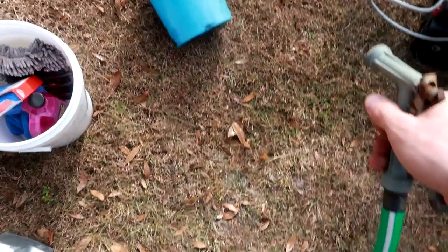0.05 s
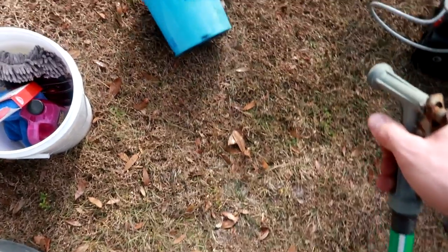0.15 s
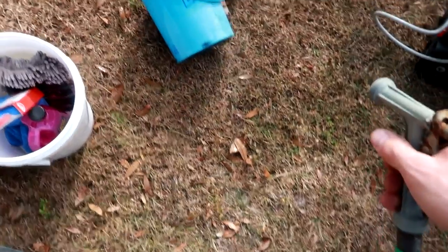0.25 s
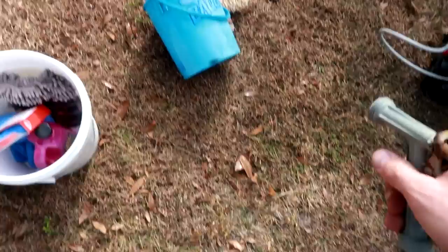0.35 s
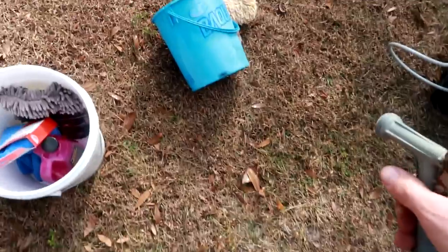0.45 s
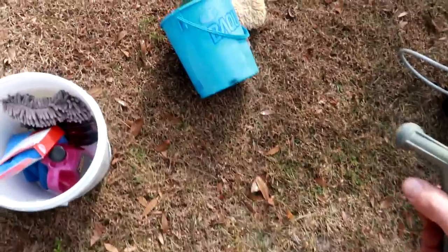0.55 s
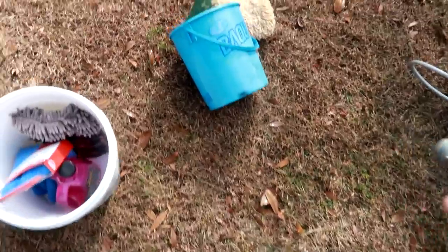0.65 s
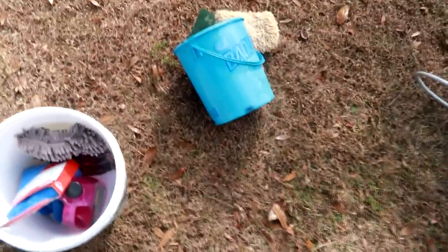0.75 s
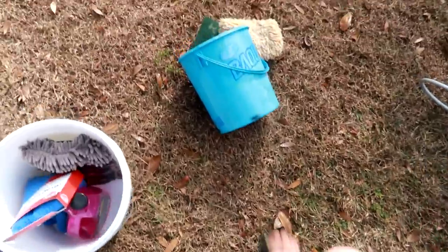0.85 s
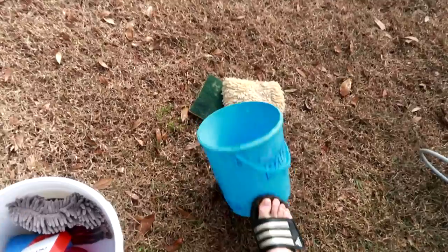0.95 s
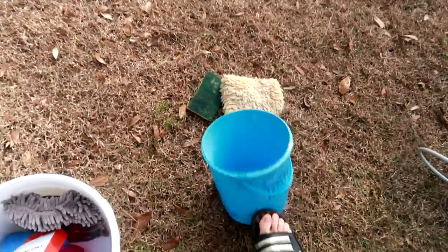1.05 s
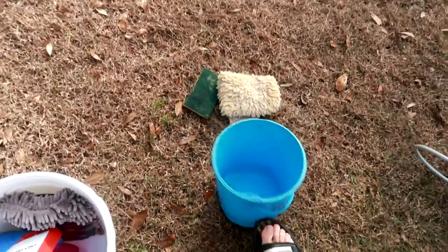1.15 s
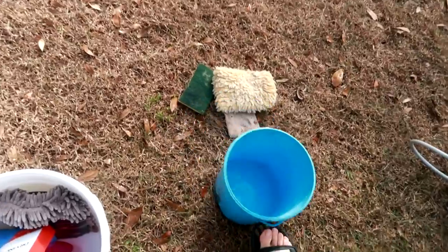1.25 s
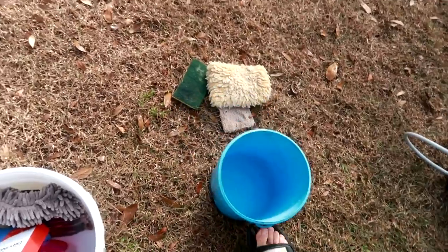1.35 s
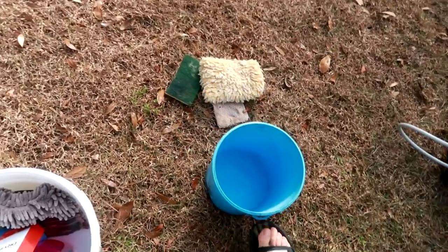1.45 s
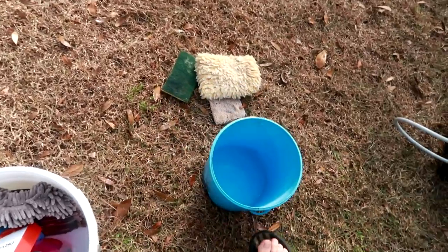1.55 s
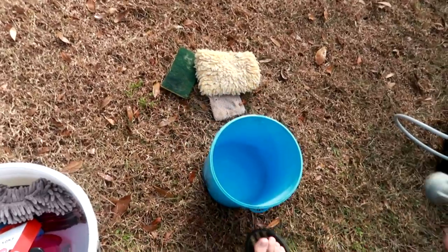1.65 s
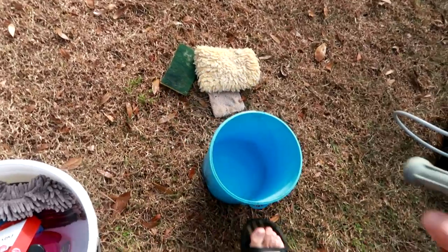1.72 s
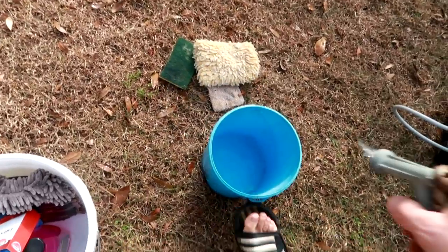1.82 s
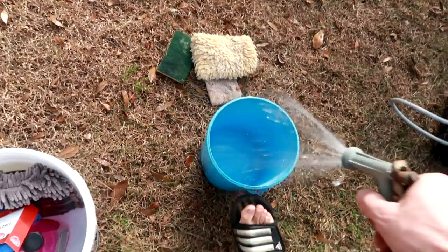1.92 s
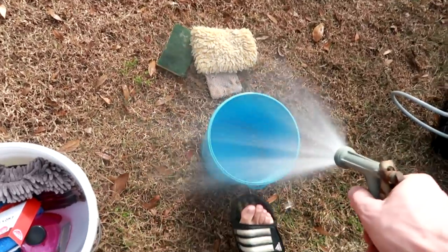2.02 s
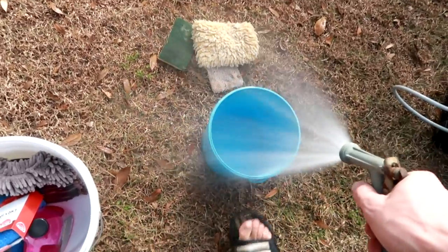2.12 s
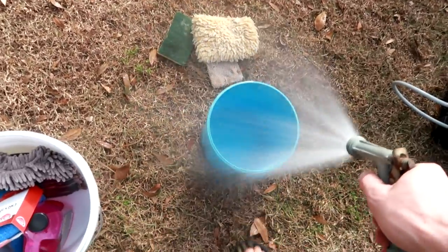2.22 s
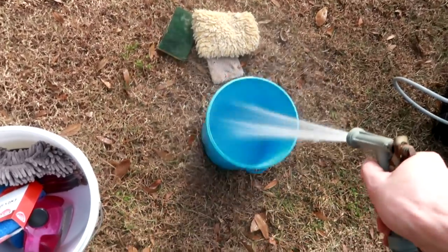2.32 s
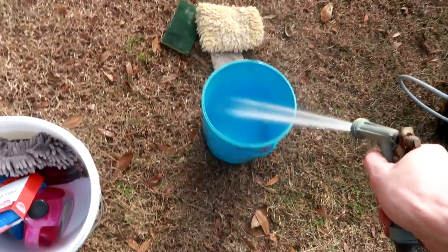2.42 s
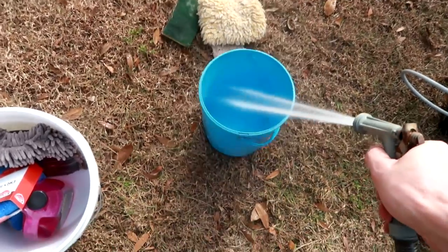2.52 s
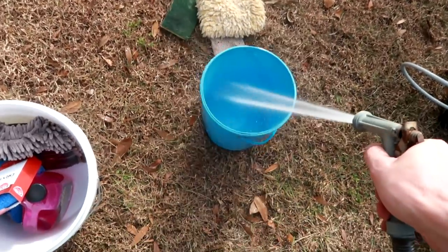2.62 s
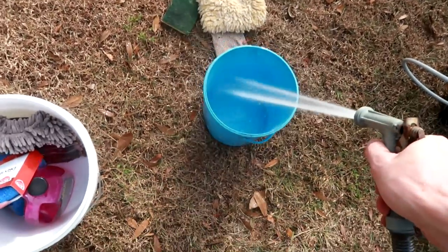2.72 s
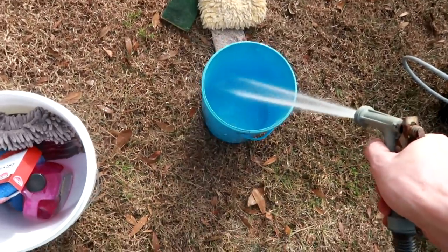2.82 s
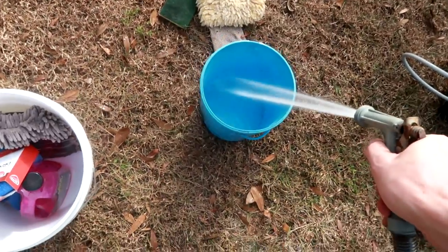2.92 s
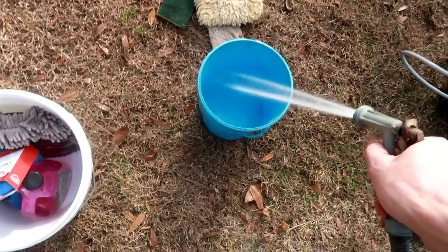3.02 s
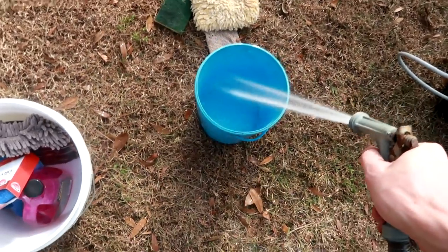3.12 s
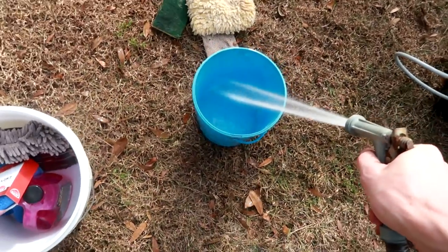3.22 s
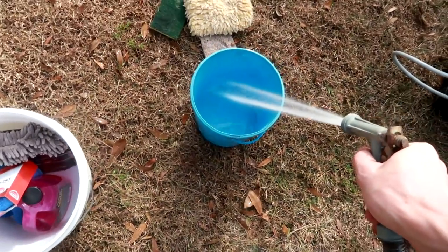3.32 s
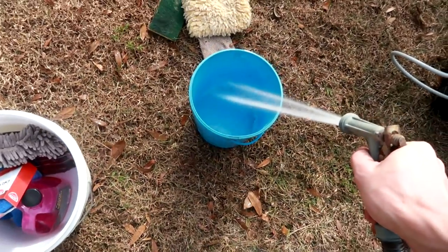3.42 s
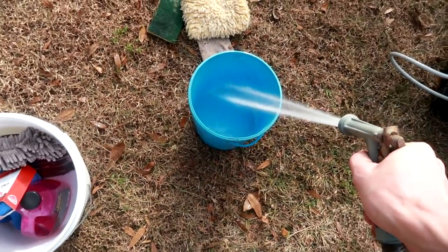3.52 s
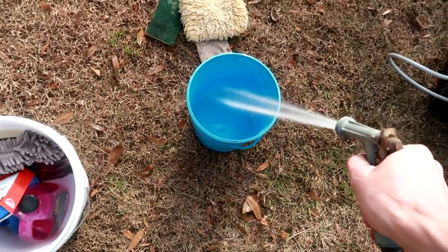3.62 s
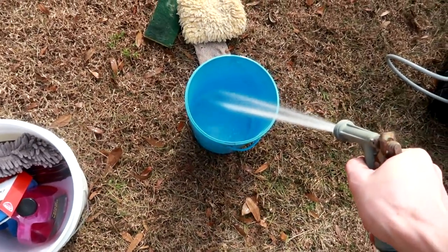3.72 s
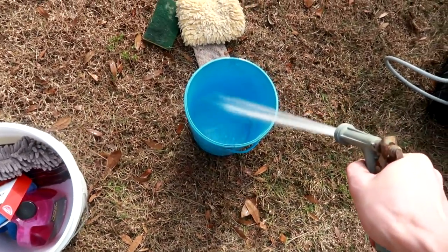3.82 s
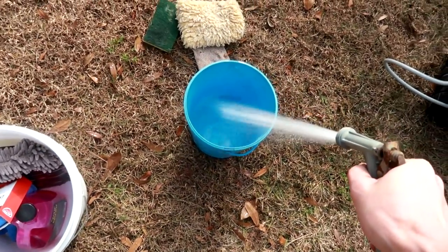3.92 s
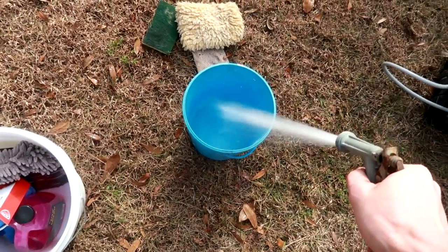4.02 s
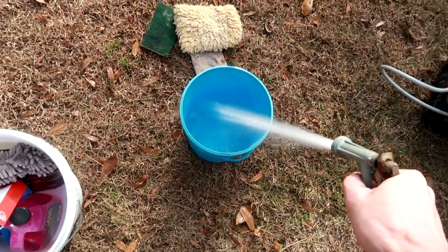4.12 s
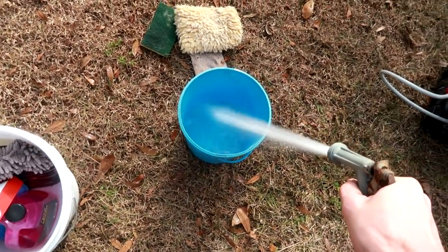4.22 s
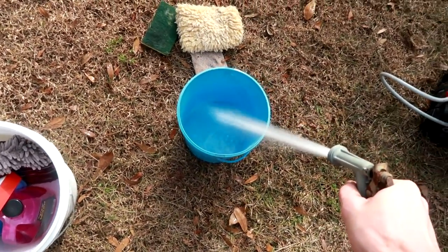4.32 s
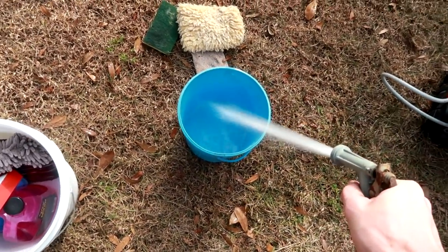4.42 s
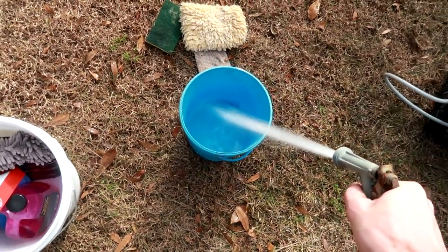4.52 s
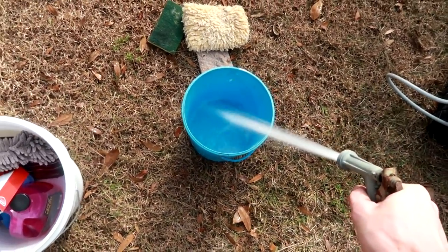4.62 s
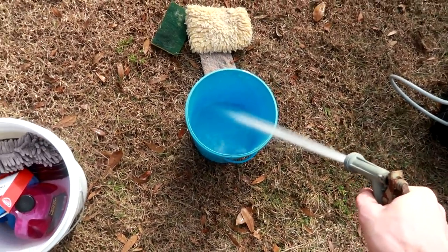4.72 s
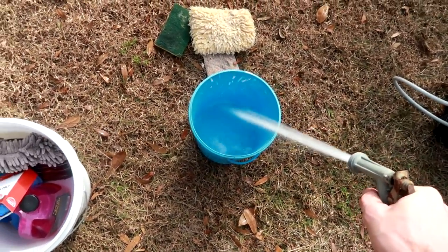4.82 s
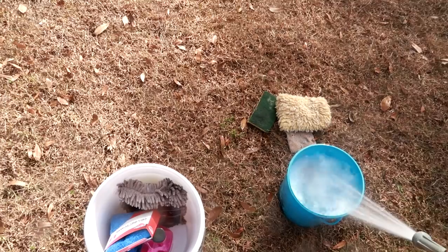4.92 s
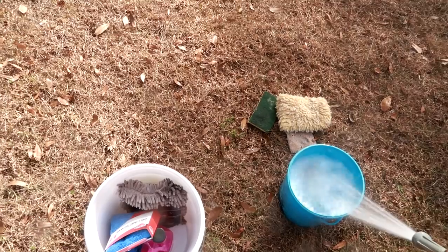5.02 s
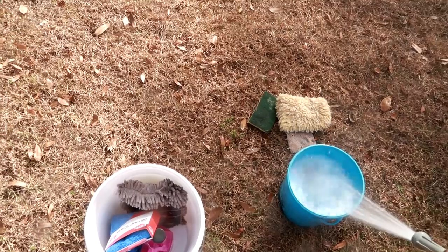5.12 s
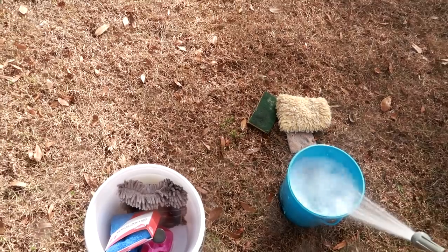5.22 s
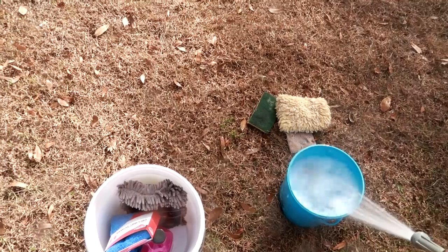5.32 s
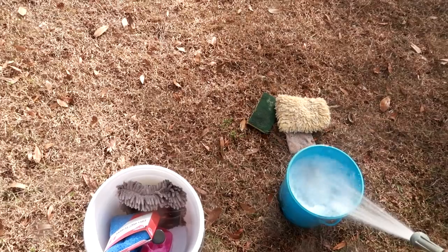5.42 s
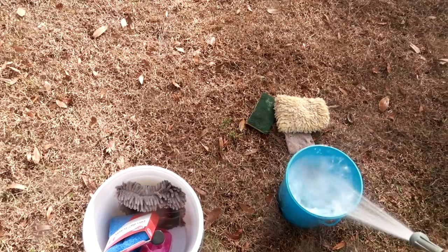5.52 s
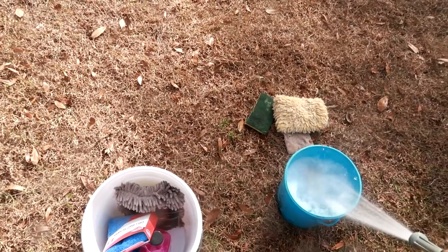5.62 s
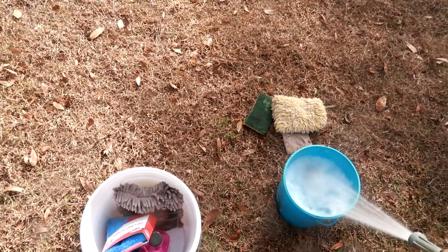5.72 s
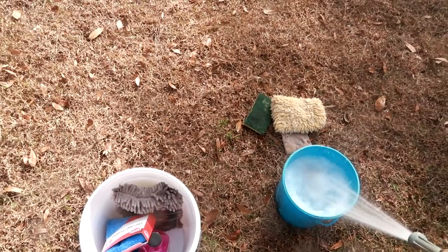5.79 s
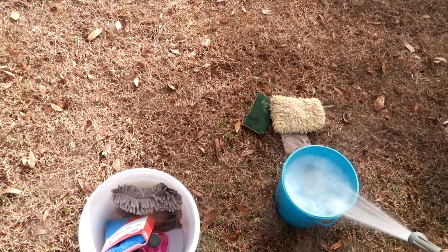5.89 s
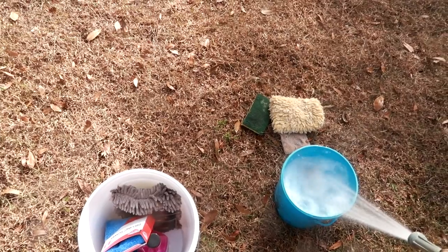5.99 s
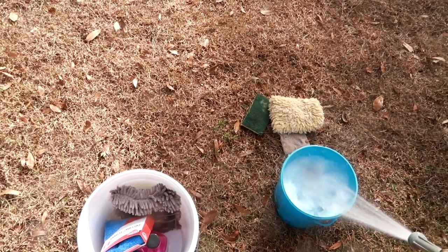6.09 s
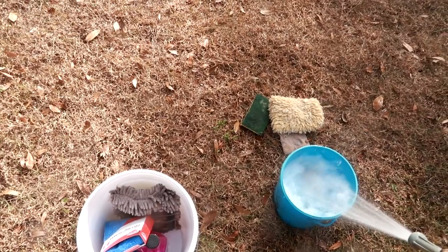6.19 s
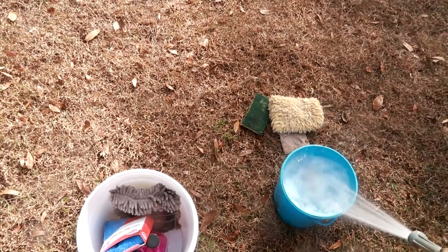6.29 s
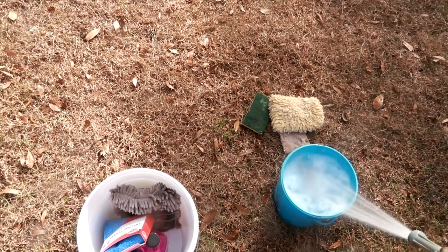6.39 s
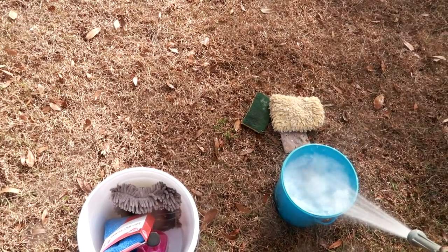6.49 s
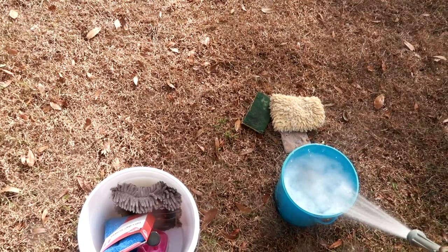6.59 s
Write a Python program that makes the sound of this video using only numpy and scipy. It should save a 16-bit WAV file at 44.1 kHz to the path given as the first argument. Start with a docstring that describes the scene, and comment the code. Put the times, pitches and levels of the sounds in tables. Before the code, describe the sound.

Close outdoor stereo pickup of a plastic bucket being rolled upright on crackling dry grass, with light knocks and a brief rim scrape. After a quiet pause, a hose nozzle spits and whistles, opens into a pattering fan, then narrows to a hard jet that drums on plastic, splatters, churns and gulps in the hollow. A sudden cut brings a steady rush into deep foam over a low drone. Faint open-air rumble lies beneath.

```python
"""Outdoors a plastic bucket is rolled upright: dry grass crackles, the plastic knocks and its rim scrapes.
A hose nozzle spits, whistles and opens to a fan of fine drops, then narrows to a hard jet. Random impacts
through resonances make the jet drum on the wall, splatter, churn and boom in the hollow, as large air
pockets gulp and gurgle. The scene then jumps to the nearly full bucket: an even rush into foam over a drone.
The open air's filtered-noise rumble lies under all of it."""
import sys
import numpy as np
from scipy import signal
from scipy.fft import rfft, irfft, next_fast_len
from scipy.io import wavfile

SR = 44100
rng = np.random.default_rng(int(sys.argv[2]) if len(sys.argv) > 2 else 0)


def unload_audio(sound):
    """Save the sound as a 16-bit wav file, at the path given as the first command line argument."""
    columns = np.transpose(np.atleast_2d(sound))
    # keep every value between -1 and 1, then stretch to whole-number steps
    steps = np.round(np.clip(columns, -1, 1) * 32767)
    wavfile.write(sys.argv[1], SR, steps.astype(np.int16))


N = 293337
TIME = np.arange(N) / SR
SIZE = next_fast_len(N + 4096)
FREQ = np.maximum(np.arange(SIZE // 2 + 1) * SR / SIZE, 1)
LOG_FREQ = np.log(FREQ)

# Standing waves in the nearly empty bucket. Each row: frequency in Hz, width in Hz, level in dB.
EMPTY_BUCKET = [(1423, 28, 10.5), (1495, 77, -7), (1743, 79, 3.5), (1930, 110, -6), (2270, 120, 3.5),
                (2524, 140, -7), (2584, 56, 11.5), (3090, 150, 3.5), (3400, 91, 0), (4040, 100, 4),
                (4460, 300, 0.5), (5100, 280, -5.5)]
# Left over right at the microphones, full above the bass. Each row: frequency in Hz, level in dB.
JET_BALANCE = [(300, .5), (480, 3), (700, 5.5), (920, 8.3), (1200, 5), (1450, 0), (1850, -2.7), (3200, 0),
               (10000, .4)]
# Likeness of the two microphones. Each row: frequency in Hz, likeness (1 = same direct sound only).
JET_LIKENESS = [(300, 0.95), (850, 1), (1200, 0.9), (1500, 0.7), (2000, 0.87), (3300, 0.97), (9000, .93),
                (12000, .74), (15000, .55)]
# Lead of the left microphone, full above the bass. Each row: frequency in Hz, phase in radians.
JET_PHASE = [(400, .04), (1150, .25), (1900, -.33), (4500, .15), (7000, .05), (10500, .42), (13000, 1)]


def from_db(db):
    """Decibels to gain."""
    return 10 ** (np.asarray(db) / 20)


def rms_one(x):
    """Scale so that the mean of the channels has rms 1."""
    return x / np.sqrt(np.mean(np.atleast_2d(x).mean(axis=0) ** 2) + 1e-20)


def in_time(rows):
    """Interpolate the columns of a time curve at every sample."""
    s, *columns = np.transpose(rows)
    return [np.interp(TIME, s, c) for c in columns]


def gains(rows):
    """dB columns as gains that die away outside the curve's span."""
    before_s = np.maximum(rows[0][0] - TIME, 0)
    after_s = np.maximum(TIME - rows[-1][0] - .04, 0)
    fade = np.exp(-(before_s + after_s) * 100)
    return [from_db(db) * fade for db in in_time(rows)]


def over_hz(points):
    """Join a spectrum's points on a log-frequency axis."""
    hz, value = np.transpose(points)
    return np.interp(LOG_FREQ, np.log(hz), value)


def filtered(x, response):
    """Pass a sound through a frequency response."""
    return irfft(rfft(x, SIZE) * response, SIZE)[..., :N]


def causal(gain):
    """Give a gain curve its minimum phase, so that it rings after an impact and never before."""
    cepstrum = irfft(np.log(gain + 1e-9), SIZE)
    cepstrum[1:SIZE // 2] *= 2
    cepstrum[SIZE // 2 + 1:] = 0
    return np.exp(rfft(cepstrum))


def colour(points, standing_waves=()):
    """A broad spectrum with the peaks and dips of a container laid over it."""
    peaks_db = sum(db / (1 + (2 * (FREQ - hz) / width) ** 2) for hz, width, db in standing_waves)
    return causal(from_db(over_hz(points) + peaks_db))


def resonance(hz, width_hz):
    """Response of one damped mode, magnitude 1 at its centre."""
    return 1 / (1 + 1j * (FREQ ** 2 - hz ** 2) / (FREQ * width_hz))


def note(excitation, hz, width_hz):
    """A resonance whose pitch moves, rung by the given excitation; rms 1."""
    turn = np.exp(2j * np.pi * np.cumsum(hz) / SR)
    keep = np.exp(-np.pi * width_hz / SR)
    ring = signal.lfilter([1], [1, -2 * keep, keep * keep], excitation / turn)
    return rms_one((ring * turn).real)


def drift(rate_hz):
    """Smooth random wander, rms 1, at about the given rate."""
    return rms_one(filtered(rng.standard_normal(N), 1 / (1 + (FREQ / rate_hz) ** 2)))


def swell(s, sigma_s):
    """A Gaussian rise and fall around one moment."""
    return np.exp(-.5 * ((TIME - s) / sigma_s) ** 2)


def drops(per_s, spread_db):
    """Random impacts, many small and a few large; rms 1."""
    when, size = rng.random((2, N))
    at = np.flatnonzero(when < per_s / SR)
    push = 2 * size[at] - 1   # sets polarity and size: the few values near zero make the big drops
    out = np.zeros(N)
    out[at] = np.sign(push) * from_db(spread_db * np.minimum(-np.log(np.abs(push)), 5))
    return rms_one(out)


def bubbles(per_s, cycles, count=16):
    """Larger bubbles ring out by 60 dB in some cycles each, at pitches over nearly three octaves; rms 1."""
    pitches_hz = np.geomspace(620, 4200, count)
    births = rms_one(drops(per_s, 5.0))
    dealt = rng.integers(0, count, N)
    out = np.zeros(N)
    for k, hz in enumerate(pitches_hz):
        keep = from_db(-60 * hz / (cycles * SR))
        step = 2 * np.pi * hz / SR
        mine = births * (dealt == k) + 1e-18
        out += signal.lfilter([0, np.sin(step)], [1, -2 * keep * np.cos(step), keep * keep], mine)
    return rms_one(out)


def heard(direct, response, likeness, balance=None, phase=None):
    """A source plus scattered sound, coloured, as the two microphones get it; rms 1."""
    # long waves press on both microphones alike; short ones differ by direction and scatter
    bass_hz, bass_mismatch = 280, 0.018
    apart = np.maximum(1 / (1 + (bass_hz / FREQ) ** 4), bass_mismatch)
    sides = np.outer([1, -1], apart)
    alike = np.clip(over_hz(likeness), 0, 1)
    scattered = rfft(rng.standard_normal(N), SIZE) * sides
    pair = np.sqrt(1 + alike) * rfft(direct, SIZE) + np.sqrt(1 - alike) * scattered
    if balance is not None:
        pair = pair * from_db(sides * over_hz(balance) / 2)
    if phase is not None:
        pair = pair * np.exp(.5j * sides * over_hz(phase))
    return rms_one(irfft(pair * response, SIZE)[:, :N])


def between_walls(splash, echoes):
    """Short echoes from the bucket's walls give the treble a slowly shifting, hollow colour."""
    echo_trim_db, above_hz = 2.5, 1700   # longer waves only make the standing waves
    wander_s, wander_hz = .00006, 0.94   # the paths shift as the hand moves the jet
    treble = filtered(splash, 1 / (1 + (above_hz / FREQ) ** 4))
    heard_at = TIME - wander_s * drift(wander_hz)
    return splash + sum(from_db(db + echo_trim_db) * np.interp(heard_at - delay, TIME, treble)
                        for delay, db in echoes)


def heaving(sound):
    """The heaving surface bends the standing waves' pitch by a few percent, at random."""
    heave_s, heave_hz = .0016, 2
    heard_at = TIME - heave_s * drift(heave_hz)
    return np.array([np.interp(heard_at, TIME, channel) for channel in sound])


def follow(law, plunge_db, spray_db):
    """Gain of a layer that grows with the plunge and with the spray."""
    usual_plunge_db, usual_spray_db = -24, -34
    level_db, per_plunge, per_spray = law
    plunge_part_db = per_plunge * (plunge_db - usual_plunge_db)
    spray_part_db = per_spray * (spray_db - usual_spray_db)
    return from_db(level_db + plunge_part_db + spray_part_db)


def outdoors():
    """Low, distant rumble of the open air, as filtered noise, with faint hums and a thin, steady whine."""
    # Rumble spectrum. Each row: frequency in Hz, level in dB.
    air_colour = [(15, -46), (25, -20), (46, -0.5), (118, -3.5), (175, -11), (231, -11.5), (293, -12),
                  (360, -16.5), (425, -14.5), (588, -16.5), (769, -19.5), (980, -21.5), (1300, -22),
                  (2200, -28.5), (11200, -47), (13500, -51), (15000, -67)]
    # Rumble level, which sinks while the jet is loud. Each row: time in seconds, level in dB.
    air = [(0, -45), (.85, -43.5), (1.1, -45.5), (2.4, -46), (2.6, -53.5), (3.2, -57), (4.1, -63.5),
           (4.9, -63), (4.925, -42), (6.65, -42.5)]
    # Each row: frequency in Hz, likeness of the two microphones.
    air_likeness = [(120, 0.23), (240, 0.35), (500, 0.54), (950, 0.42), (3770, 0.0073), (15000, 0)]
    # Each row: frequency in Hz, left over right in dB.
    air_balance = [(200, .3), (500, 1.3), (720, 4), (1100, -.3), (2000, .2), (10000, 0)]
    # Wavering hums far away. Each row: frequency in Hz, width in Hz, level in dB, end in seconds.
    hums = [(296.4, 9.7, -67.5, 6.65), (422, 35, -59, 1.1)]
    waver_db, waver_hz = 0.65, 14
    whine_hz, whine_db = 13006, -84
    level = gains(air)[0] * from_db(waver_db * drift(waver_hz))
    rumble = level * heard(rng.standard_normal(N), colour(air_colour), air_likeness, air_balance)
    hum = np.zeros(N)
    for hz, width_hz, db, end_s in hums:
        fade = np.clip((end_s - TIME) * 10, 0, 1)
        hum += from_db(db) * fade * note(rng.standard_normal(N), np.full(N, hz), width_hz)
    whine = from_db(whine_db) * np.sqrt(2) * np.sin(2 * np.pi * whine_hz * TIME)
    return rumble + hum + whine


def grass():
    """Dry stalks crunch and leaves crackle, as random impacts, while the bucket is rolled upright."""
    # Each row: peak time in seconds, sigma in seconds, crunch level in dB, crackle level in dB.
    rustles = [(.01, 0.029, -51, -48), (0.325, 0.037, -70, -69.5), (0.693, 0.044, -53, -58.5),
               (0.824, 0.02, -61, -59)]
    # Each row: frequency in Hz, likeness of the two microphones.
    rustle_likeness = [(500, .7), (900, .3), (1800, 1), (3200, 0.53), (6000, 0.32), (13000, 0.34)]
    end_s, crunch_db, crackle_db = 1.0, -65, -72   # faint stirring until the bucket stands
    stirring = np.clip((end_s - TIME) * 10, 0, 1)
    crunch = from_db(crunch_db) * stirring
    crackle = from_db(crackle_db) * stirring
    for s, sigma_s, stalks_db, leaves_db in rustles:
        crunch += from_db(stalks_db) * swell(s, sigma_s)
        crackle += from_db(leaves_db) * swell(s, sigma_s)
    stalk_colour = colour([(500, -5), (1050, -12), (1450, -7), (1900, -5), (2400, -7), (3200, -12),
                           (5000, -14), (12000, -40)])
    leaf_colour = colour([(1500, -5), (3500, -1.0), (7000, -0.5), (11500, -5), (15000, -19)])
    stalks = heard(drops(1500, 2.6), stalk_colour, rustle_likeness)
    leaves = heard(drops(2500, 1.1), leaf_colour, rustle_likeness)
    return crunch * stalks + crackle * leaves


def knocks():
    """Knocks and snapping stalks ring the plastic briefly, with one mode that depends on the spot."""
    # Each row: start in seconds, level in dB, spot's ring in Hz, share of the bucket's modes in dB.
    contacts = [(.156, -28.5, 2720, 3.5), (.188, -37.5, 2600, -3), (.470, -46, 3540, -17),
                (.510, -40, 3400, -7), (.636, -49, 3800, -16), (.700, -43, 2900, -16),
                (.714, -35, 1480, -17), (.727, -39, 1300, -16), (.756, -36, 1530, -19),
                (.796, -37, 2340, -17), (.802, -38.5, 2400, -16), (.838, -48, 3000, -15),
                (.980, -48, 3500, -14)]
    # The bucket's modes. Each row: frequency in Hz, level in dB, 60 dB decay in seconds.
    bucket_modes = [(650, 0, 0.025), (1160, -21, .02), (1450, -15, .02), (2090, -11, .02),
                    (4000, -18, .012), (7400, -15, .0055)]
    snap = 7   # the first sharp contact, relative to the scuff that follows
    out = np.zeros(N)
    age = TIME[:SR // 5]
    for s, db, spot_hz, body_db in contacts:
        start = int(s * SR)
        modes = [(hz, level + body_db, t60) for hz, level, t60 in bucket_modes] + [(spot_hz, 0, .006)]
        ring = sum(from_db(level - 60 * age / t60) * np.sin(2 * np.pi * hz * age)
                   for hz, level, t60 in modes)
        contact = rng.standard_normal(len(age)) * np.exp(-age / 0.0048)   # a rough, scuffing touch
        contact[0] += snap
        hit = signal.fftconvolve(ring, contact)[:len(age)]
        knock = hit / np.abs(hit).max() + from_db(body_db - 18) * contact
        out[start:start + len(age)] += from_db(db) * knock
    return filtered(out, colour([(8000, 0.0), (11000, -3), (15000, -14)]))


def scrapes():
    """The rim catches on the ground: quick, uneven slips over grit ring the plastic."""
    # Each row: peak time in seconds, sigma in seconds, pitch in Hz, level in dB.
    catches = [(.665, .018, 1380, -56), (.72, .02, 1430, -49.5), (0.8, 0.007, 2340, -48.5)]
    slips_per_s, width_hz, grit_db = 450, 260, -3
    slips = drops(slips_per_s, 1.5)
    grit_colour = colour([(500, -12), (1100, 0), (2600, -2), (4000, -12), (12000, -28)])
    grit = from_db(grit_db) * rms_one(filtered(slips, grit_colour))
    return sum(from_db(db) * swell(s, sigma_s) * (grit + note(slips, np.full(N, hz), width_hz))
               for s, sigma_s, hz, db in catches)


def nozzle():
    """The valve spits air and water and whistles, then a fan of fine drops patters on bucket and ground."""
    # Air and first water through the valve. Each row: time in seconds, level in dB.
    spit_level = [(1.87, -80), (1.888, -61), (1.925, -60), (1.945, -50.5), (1.968, -47), (1.99, -50),
                  (2.02, -50), (2.06, -55)]
    # Spectra. Each row: frequency in Hz, level in dB.
    spit_colour = [(1500, -7), (4500, -7), (6500, 0), (8500, -1), (10500, 1.5), (12500, -7), (15000, -15)]
    fan_colour = [(60, -24), (160, 5), (230, 4), (300, 10), (420, 2), (540, 3.5), (680, 9), (850, 10),
                  (1100, 4.5), (1700, 1), (3500, 4), (6000, 0.5), (11000, -1.5), (15000, -18)]
    # Each row: frequency in Hz, likeness of the two microphones.
    fan_likeness = [(300, 0.93), (1500, 0.94), (4500, 0.86), (7500, 0.47), (13000, .3)]
    # Each row: frequency in Hz, left over right in dB, full above the bass.
    fan_balance = [(400, .4), (650, 3), (920, 8), (1400, 1.5), (2000, -.7), (10000, .1)]
    spit = gains(spit_level)[0] * heard(drops(9000, 1.9), colour(spit_colour), fan_likeness)

    # the last air whistles through the valve, falling in pitch
    whistle_s, sigma_s, whistle_db = 1.966, 0.01, -42
    start_hz, fall_hz_per_s, width_hz = 10300, 35000, 1500   # start_hz holds at whistle_s
    whistle_hz = start_hz - fall_hz_per_s * np.clip(TIME - whistle_s, -2 * sigma_s, 2 * sigma_s)
    air = note(rng.standard_normal(N), whistle_hz, width_hz)
    whistle = from_db(whistle_db) * swell(whistle_s, sigma_s) * air

    opens_s, rise_s, narrows_s, fall_db_per_s, fan_db = 2.053, 0.063, 2.43, 198, -26.5
    opening = (1 - np.exp(-np.maximum(TIME - opens_s, 0) / rise_s)) ** 2
    level = opening * from_db(fan_db - fall_db_per_s * np.maximum(TIME - narrows_s, 0))
    first_drops = from_db(-51) * swell(2.06, 0.023)   # the first drops land ahead of the fan
    fan = heard(drops(12000, 1.0), colour(fan_colour, [(826, 80, 1.8)]),
                fan_likeness, fan_balance, JET_PHASE)
    return spit + whistle + (level + first_drops) * fan


def hollow(low_hz, thud_db):
    """Slugs of water excite the bucket's lowest note and thud on its bottom."""
    # Each row: frequency in Hz, level in dB.
    thud_colour = [(50, -32), (130, -16), (175, -9), (210, 2.5), (250, 3), (400, -8), (800, -50)]
    width_hz, waver_share, waver_hz = 67, 0.021, 10
    cushion_s, cushion_db = 3.8, 1   # from then on the water cushions the bottom
    balance_db = 0.5   # the bucket stands a little to the left
    thud = rms_one(filtered(drops(2000, 0.71), colour(thud_colour)))
    share = from_db(thud_db - cushion_db * np.clip((TIME - cushion_s) * 10, 0, 1))
    hz = low_hz * (1 + waver_share * drift(waver_hz))
    ring = note(note(drops(3000, 2.1), hz, width_hz), hz, 2 * width_hz)
    pan = from_db(np.array([[.5], [-.5]]) * balance_db)
    return pan * (ring + share * thud) / np.sqrt(1 + share ** 2)


def churning(surge, upper_hz):
    """Air pockets driven under water collapse and ring the bucket's upper note."""
    # Each row: frequency in Hz, level in dB.
    churn_colour = [(330, -40), (440, -13), (510, -10), (600, -2.5), (720, -0.5), (850, -0.5), (1020, 0.5),
                    (1300, -5.5), (1750, -25), (3000, -42), (8000, -66)]
    waver_share, waver_hz = 0.031, 11
    pockets = rms_one(drops(4500, 1.95) * from_db(1.7 * surge))
    wavering_hz = upper_hz * (1 + waver_share * drift(waver_hz))
    ring = note(drops(4500, 1.7) * from_db(1.2 * surge), wavering_hz, width_hz=122)
    return heard(pockets + from_db(-15.5) * ring, colour(churn_colour, EMPTY_BUCKET),
                 JET_LIKENESS, JET_BALANCE, JET_PHASE)


def jet():
    """The jet breaks into slugs: each surge churns the water and throws splatter and mist together."""
    # Controls, before the trims below. Each row: time in seconds, level in dB.
    plunge = [(2.42, -41), (2.475, -19), (2.55, -21), (2.59, -40), (2.76, -30), (2.87, -28), (2.96, -22),
              (3.08, -21), (3.22, -22.5), (3.7, -20.5), (4.02, -22), (4.07, -24), (4.13, -27.5),
              (4.22, -26.5), (4.38, -30), (4.455, -22), (4.5, -22), (4.56, -31.5), (4.66, -21.5),
              (4.78, -19), (4.86, -23.5), (4.92, -20)]   # how hard the jet plunges into the water
    spray = [(2.42, -30.5), (2.48, -33), (2.6, -31), (2.9, -30), (3.1, -35.5), (3.52, -32.5), (3.75, -36.5),
             (4.02, -37.5), (4.11, -42.5), (4.22, -37.5), (4.6, -37.5), (4.92, -42)]   # how much bursts into fine spray, most while it hits bare plastic
    boom = [(2.42, -33), (2.47, -32), (2.58, -40), (2.7, -41), (2.9, -38.5), (3.0, -29), (3.08, -31.5),
            (3.2, -48.5), (3.4, -33.5), (3.58, -36.5), (3.76, -35), (3.88, -43), (4.0, -41.5), (4.5, -39),
            (4.57, -46), (4.66, -41), (4.8, -38.5), (4.92, -40)]   # the hollow's low boom
    # Notes waver as water covers the bottom. Each row: time in seconds, low note in Hz, upper note in Hz.
    hollow_notes = [(2.5, 305, 865), (2.66, 292, 800), (2.8, 318, 765), (2.93, 310, 875), (3.03, 298, 850),
                    (3.15, 300, 790), (3.34, 295, 785), (3.42, 315, 880), (3.58, 330, 830),
                    (3.72, 312, 810), (3.84, 303, 875), (4.0, 290, 860), (4.4, 288, 855), (4.6, 287, 900),
                    (4.75, 288, 840), (4.92, 290, 880)]
    # Spectra. Each row: frequency in Hz, level in dB.
    splatter_colour = [(600, -35), (1300, -5.5), (1800, 0), (2800, 0), (3500, 0), (4600, 3.5), (6200, -1),
                       (7500, -29), (14000, -26)]
    mist_colour = [(400, -30), (1500, -15), (4000, -1), (6300, -1), (7800, -1.5), (10000, -1),
                   (11700, -4.5), (13000, -8.5), (15200, -19)]
    slosh_colour = [(800, -28), (1400, -3.5), (1750, 2), (2800, 1), (3600, -4), (8000, -52)]
    # Echoes inside the empty bucket, before the echo trim. Each row: delay in seconds, level in dB.
    empty_echoes = [(0.001952, -23), (0.002272, -13), (0.003016, -16), (0.003748, -15)]
    # Each holds: level in dB at the usual plunge and spray, dB per dB of plunge, dB per dB of spray.
    splatter_law = (-28.5, 0.47, 1)
    slosh_law = (-28.5, 0.79, 0.23)
    churn_trim_db, mist_trim_db, boom_trim_db = 0.18, 3.5, 3
    start_s, thud_db, thud_fade_db_per_s = 2.42, -2, 6.5   # thuds less as the water deepens

    (plunge_db,), (spray_db,), (boom_db,) = in_time(plunge), in_time(spray), in_time(boom)
    low_hz, upper_hz = in_time(hollow_notes)
    age = TIME - start_s
    surge = 2 * np.tanh(drift(39) / 3.05)   # the slugs have a largest size
    direction = JET_LIKENESS, JET_BALANCE, JET_PHASE
    spits = drops(550, 2.0)   # larger drops, heard across the treble

    splatter = drops(7000, 3.4) * from_db(2.3 * surge) + .35 * spits
    splashing = heard(between_walls(splatter, empty_echoes),
                      colour(splatter_colour, EMPTY_BUCKET), *direction)
    mist = drops(12000, 2.8) * from_db(1.5 * surge) + .3 * spits
    hissing = heard(between_walls(mist, empty_echoes), colour(mist_colour), *direction)
    slosh = drops(4000, 1.7) + from_db(-11) * bubbles(per_s=830, cycles=20)
    sloshing = heard(slosh * from_db(0.94 * surge), colour(slosh_colour, EMPTY_BUCKET), *direction)

    water = from_db(boom_db + boom_trim_db) * hollow(low_hz, thud_db - thud_fade_db_per_s * age)
    water += from_db(plunge_db + churn_trim_db) * churning(surge, upper_hz)
    water += follow(slosh_law, plunge_db, spray_db) * heaving(sloshing)
    water += follow(splatter_law, plunge_db, spray_db) * heaving(splashing)
    water += from_db(spray_db + mist_trim_db) * hissing
    return np.clip(age / 0.031, 0, 1) * water


def wall():
    """The jet strikes bare plastic: a thump on the bottom, then uneven drumming and splash off the wall."""
    # Each row: peak time in seconds, sigma in seconds, drumming level in dB, splash level in dB.
    hits = [(2.494, 0.011, -41, -18), (2.539, 0.02, -37, -21.5), (2.593, 0.034, -29, -50),
            (2.678, 0.043, -24, -39), (2.779, 0.023, -28, -31), (2.996, 0.073, -25.5, -25.5)]
    # Each row: frequency in Hz, width in Hz, level in dB; each mode's response is squared.
    wall_modes = [(1354, 270, -0.5), (2130, 480, 3)]
    # Each row: frequency in Hz, level in dB.
    splash_colour = [(400, -12.5), (650, 8), (1200, -9), (1800, -6), (2900, 3), (4200, 1.5), (5000, -12),
                     (7000, -16), (10000, -17), (15000, -37)]
    thump_s, thump_sigma_s, thump_hz, thump_db = 2.464, 0.012, 162, -32
    direction = JET_LIKENESS, JET_BALANCE, JET_PHASE
    modes = sum(from_db(db) * resonance(hz, width_hz) ** 2 for hz, width_hz, db in wall_modes)
    drumming = heard(drops(1600, 1.0), modes, *direction)
    splash = heard(drops(8000, 1.9), colour(splash_colour), *direction)
    thump_ring = note(drops(3200, 1.0), np.full(N, thump_hz), width_hz=86)
    thump = from_db(thump_db) * swell(thump_s, thump_sigma_s) * thump_ring
    return thump + sum(swell(s, sigma_s) * (from_db(drum_db) * drumming + from_db(splash_db) * splash)
                       for s, sigma_s, drum_db, splash_db in hits)


def gulps():
    """Each large air pocket rings for a few cycles, rising a little in pitch as it nears the surface."""
    # Each row: peak time in seconds, pitch at the peak in Hz, level in dB before the flutter.
    pockets = [(2.48, 289, -26.5), (2.662, 302, -33), (2.925, 306, -31), (2.942, 883, -19.5),
               (2.98, 844, -24), (3.035, 850, -19), (3.04, 304, -19.5), (3.085, 840, -21),
               (3.155, 795, -23), (3.278, 817, -17.5), (3.37, 270, -27), (3.398, 940, -19),
               (3.489, 308, -29), (3.533, 946, -19), (3.59, 340, -27), (3.665, 310, -26), (3.731, 307, -23),
               (3.809, 890, -21), (3.846, 861, -15), (3.992, 860, -15.5), (4.012, 285, -26),
               (4.26, 302, -30.5), (4.455, 847, -15), (4.495, 890, -16.5), (4.631, 278, -35),
               (4.692, 894, -20), (4.742, 873, -11.5), (4.78, 280, -29), (4.814, 799, -15.5),
               (4.88, 286, -33), (4.908, 894, -15.5)]
    sigma_cycles, rise_share, flutter_db = 5.1, 0.013, 1.5   # the pitch rises by this share per sigma
    out = np.zeros(N)
    for s, hz, db in pockets:
        sigma_s = sigma_cycles / hz
        near = np.flatnonzero(np.abs(TIME - s) < 4 * sigma_s)
        age = (TIME[near] - s) / sigma_s
        turns = sigma_cycles * (age + rise_share * age ** 2 / 2) + rng.random()
        out[near] += from_db(db) * np.exp(-.5 * age ** 2) * np.sin(2 * np.pi * turns)
    pan = from_db(np.outer([.5, -.5], over_hz(JET_BALANCE)))
    return filtered(out * from_db(flutter_db * drift(130)), pan)


def slaps():
    """Single big drops slap the plastic with one short, bright crack each."""
    # Each row: start in seconds, peak level in dB.
    big_drops = [(2.5838, -6.5), (2.64, -10), (2.754, -14), (2.7625, -6), (2.804, -8), (3.0651, -19),
                 (3.3694, -16), (3.535, -12), (3.6435, -10), (4.026, -17), (4.1781, -22), (4.471, -22),
                 (4.643, -15)]
    crack_colour = colour([(800, -25), (3000, -4), (5500, 0), (8500, -4), (15000, -22)])
    crack = irfft(crack_colour, SIZE)[:SR // 100]
    clicks = np.zeros(N)
    for s, db in big_drops:
        clicks[int(s * SR)] = from_db(db)
    return signal.fftconvolve(clicks, crack / np.abs(crack).max())[:N]


def gurgles():
    """Drops ring each air pocket held open under the jet; its pitch trembles as it changes shape."""
    # Each row: peak time in seconds, sigma in seconds, pitch in Hz, level in dB.
    pockets = [(2.958, 0.026, 4000, -28), (3.04, 0.017, 1330, -29), (3.3, 0.049, 2130, -40),
               (3.569, 0.027, 2590, -32), (3.638, 0.06, 1240, -28), (3.77, 0.054, 2910, -31),
               (4.156, 0.049, 2240, -38), (4.27, 0.029, 2680, -40), (4.667, 0.022, 3160, -32),
               (4.757, 0.16, 2236, -33), (4.873, 0.032, 2720, -31)]
    width_hz, tremble_share, tremble_hz = 130, 0.022, 33.4
    impacts = drops(1500, 2.2)
    tremble = 1 + tremble_share * drift(tremble_hz)
    return sum(from_db(db) * swell(s, sigma_s) * note(impacts, hz * tremble, width_hz)
               for s, sigma_s, hz, db in pockets)


def foam():
    """Deep foam cushions the jet: tiny bubbles rush, larger ones gurgle, and the full bucket drones."""
    # Each row: frequency in Hz, level in dB.
    foam_colour = [(40, -28), (70, -9.5), (230, -10.5), (350, 0), (780, -5.5), (1150, -1), (1900, -3),
                   (3600, -1.5), (5200, -4), (7000, -3), (10000, -6), (12000, -10), (15000, -25.5)]
    # Standing waves. Each row: frequency in Hz, width in Hz, level in dB.
    full_bucket = [(166, 60, 9), (455, 103, 4.5), (575, 57, -7), (643, 97, 6), (790, 143, 8.5),
                   (1474, 105, -14.5), (1730, 200, 1), (2080, 260, -6), (3200, 320, -3), (3600, 230, 3),
                   (4530, 250, 3)]
    # Echoes, before the echo trim. Each row: delay in seconds, level in dB.
    full_echoes = [(0.00086, -44), (0.001132, -36), (0.001408, -33), (0.002348, -18.5)]
    # Each row: frequency in Hz, then likeness, left over right in dB or left lead in radians.
    foam_likeness = [(150, .999), (400, 1), (900, 0.97), (2000, 0.95), (3200, 0.85), (7500, 0.7),
                     (12000, 0.8)]
    foam_balance = [(300, .1), (480, 1), (700, 4), (900, 4.5), (1200, 0), (3000, -2.2), (10000, -.6)]
    foam_phase = [(300, .08), (1000, .13), (2000, -.2), (3200, -.7), (7500, -1.15), (10500, -1),
                  (13000, -1.55)]
    # The heavy bucket under the jet. Each row: frequency in Hz, width in Hz, level in dB.
    drones = [(75.1, 2.8, -49.5), (165.6, 24, -46)]
    foam_db = -23
    fizz = drops(20000, 2.9) * from_db(0.18 * drift(36))
    water = rms_one(fizz + from_db(-16.0) * bubbles(per_s=1400, cycles=16))
    rush = heard(between_walls(water, full_echoes), colour(foam_colour, full_bucket),
                 foam_likeness, foam_balance, foam_phase)
    push = rng.standard_normal(N)
    drone = sum(from_db(db) * note(push, np.full(N, hz), width_hz) for hz, width_hz, db in drones)
    return from_db(foam_db) * rush + drone


def scene():
    """The start of the filling, then abruptly its end, under the same open air."""
    jump_s, crossfade_s = 4.937, .002
    later = np.clip((TIME - jump_s) / crossfade_s, 0, 1)
    handling = grass() + knocks() + scrapes()
    filling = nozzle() + jet() + wall() + gulps() + slaps() + gurgles()
    return outdoors() + (1 - later) * (handling + filling) + later * foam()


def record(dry):
    """Cut the top of the treble steeply."""
    cutoff_hz = 15400
    return filtered(dry, 1 / np.sqrt(1 + (FREQ / cutoff_hz) ** 160))


dry = scene()
out = record(dry)
unload_audio(out)
```